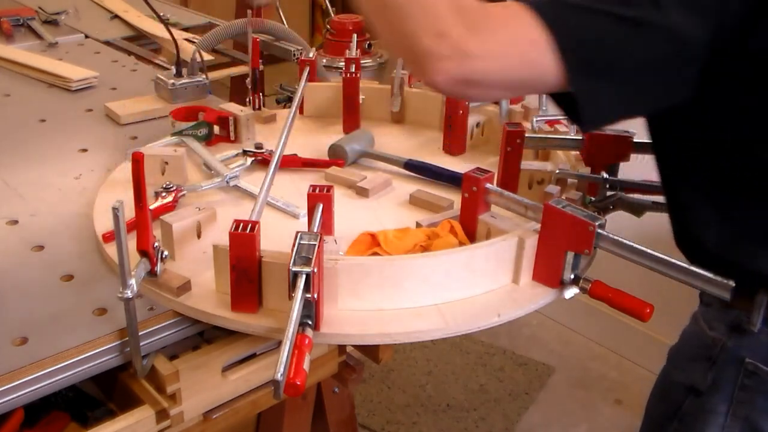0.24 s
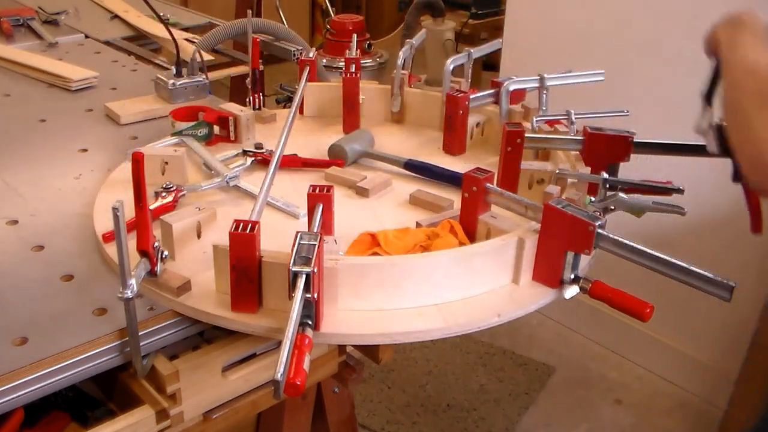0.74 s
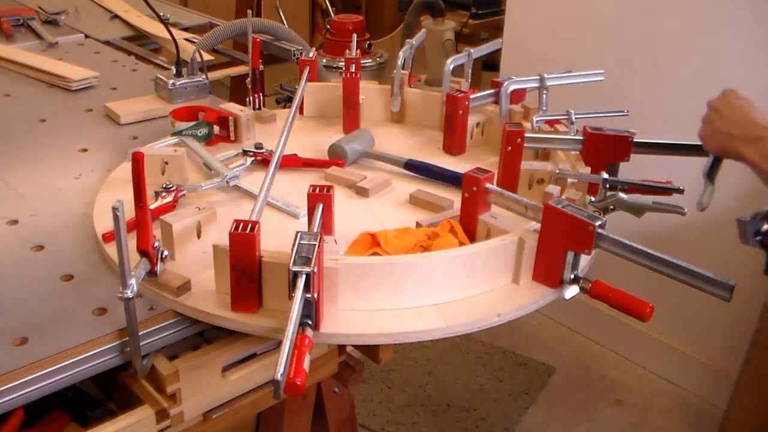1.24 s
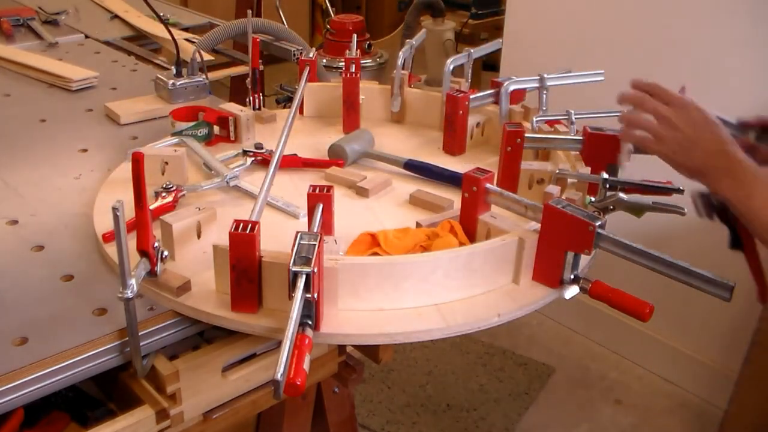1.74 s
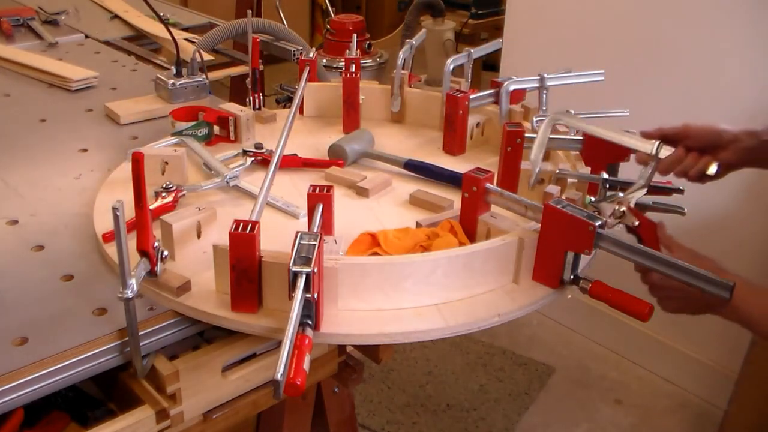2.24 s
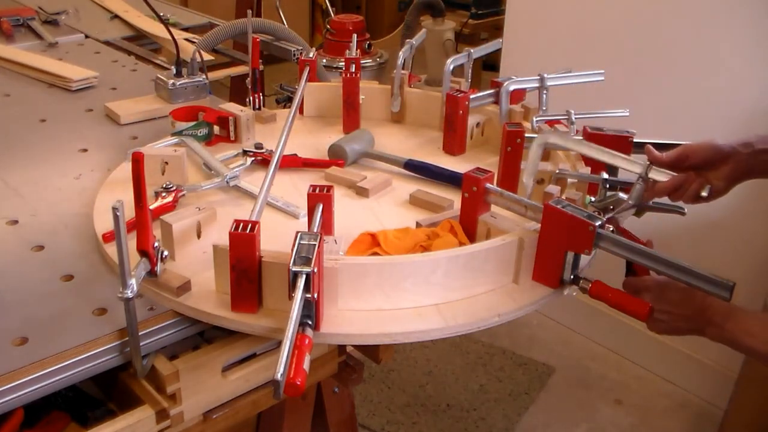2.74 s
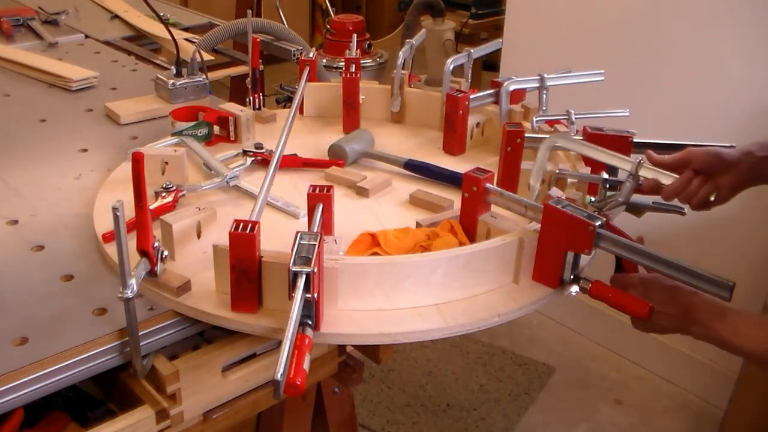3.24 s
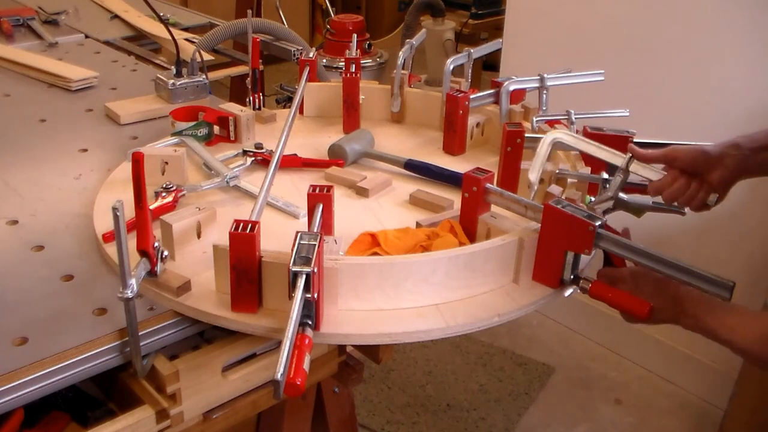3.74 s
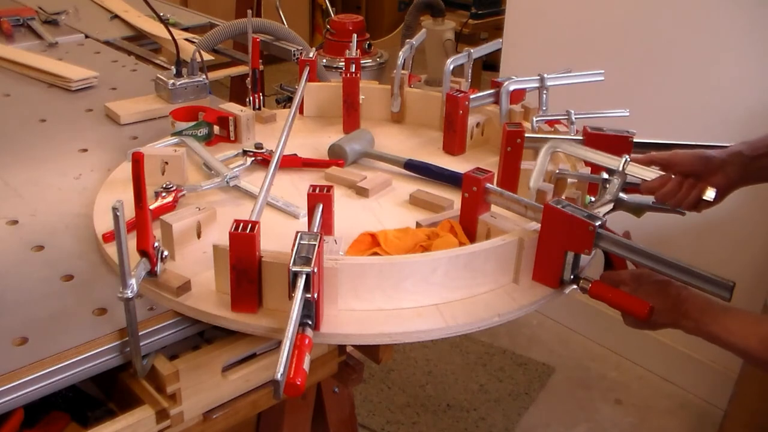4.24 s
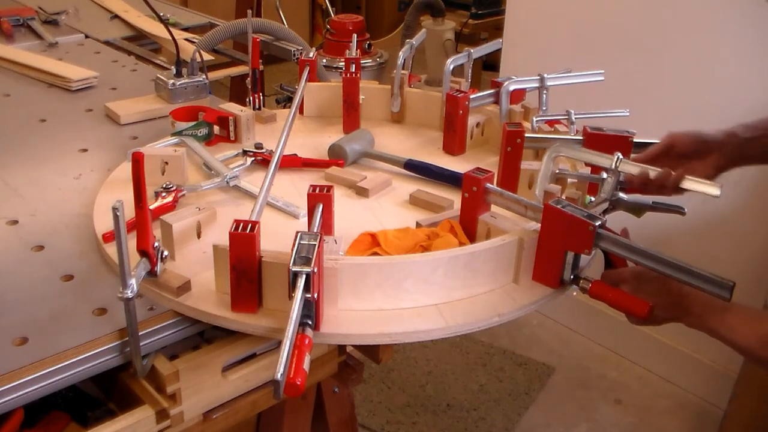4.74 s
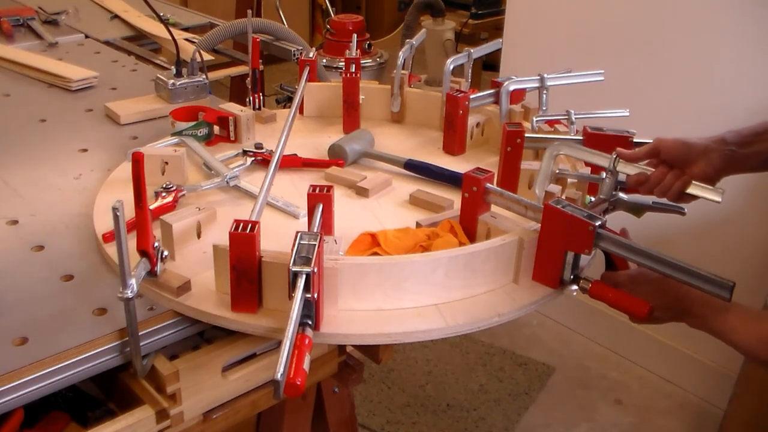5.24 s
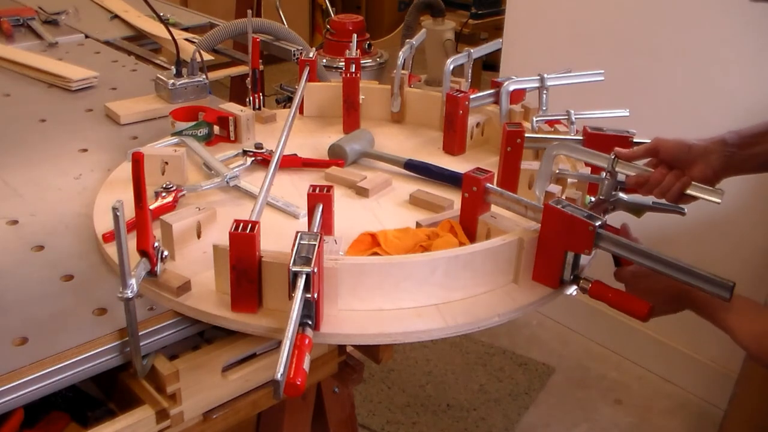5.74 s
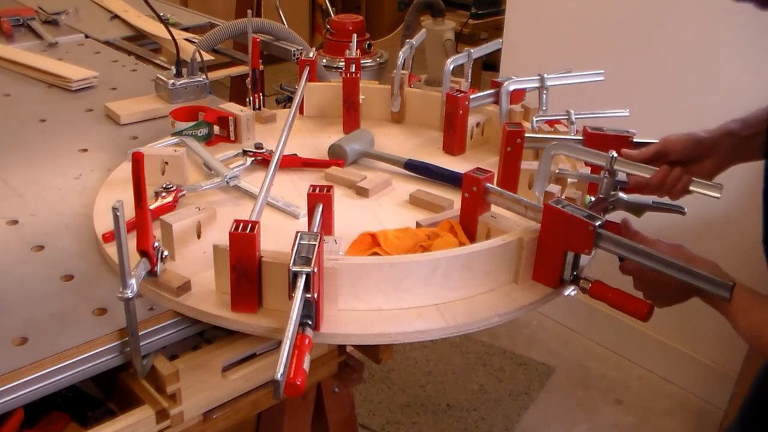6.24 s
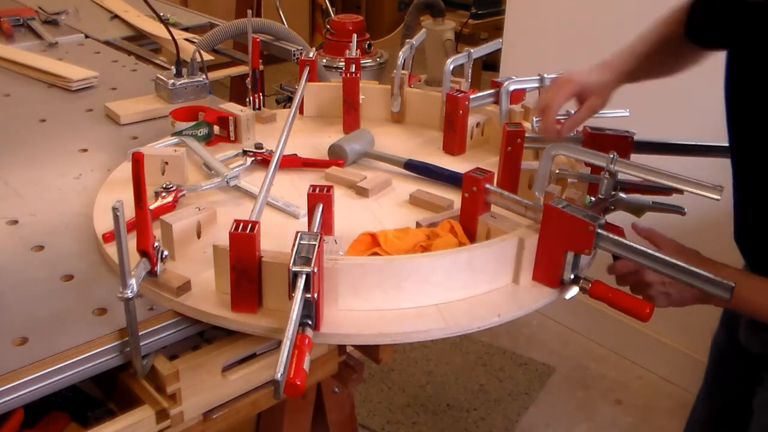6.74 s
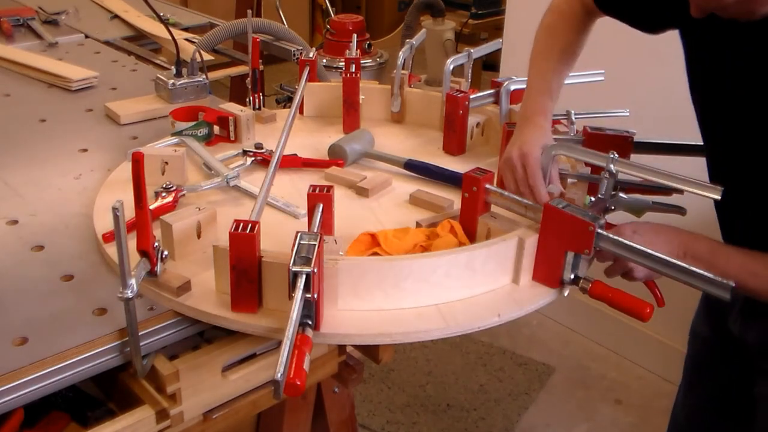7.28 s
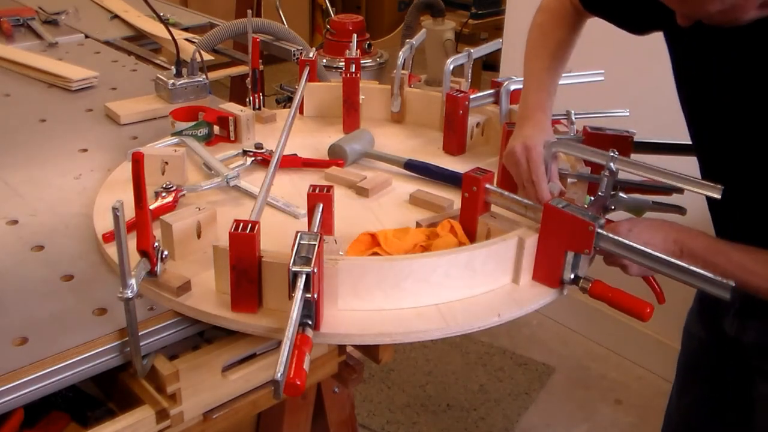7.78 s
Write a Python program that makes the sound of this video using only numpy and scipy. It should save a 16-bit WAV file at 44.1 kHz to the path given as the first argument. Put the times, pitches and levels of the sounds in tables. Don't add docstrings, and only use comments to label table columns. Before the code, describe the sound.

Loose metal clamps rattle, scrape open and clack hard against steel and wood, ringing briefly in a small humming workshop.

```python
import sys
import numpy as np
from scipy import signal
from scipy.fft import rfft, irfft, next_fast_len
from scipy.io import wavfile
from scipy.ndimage import uniform_filter1d, map_coordinates

SR = 44100
rng = np.random.default_rng(int(sys.argv[2]) if len(sys.argv) > 2 else 0)


def voltage_ratio(decibels):
    exponent = np.asarray(decibels, float) / 20
    return 10 ** exponent


def to_wav(sig):
    pcm = np.clip(np.atleast_2d(sig), -1, 1) * 32767
    pcm = np.round(pcm).astype(np.int16)
    wavfile.write(sys.argv[1], SR, pcm.T)


N = 353241

# start in seconds, level in dB, weight in dB, treble in dB.
STEEL_TAPS = [(0.214, -68, 4, 5), (0.5018, -39, -11, -2), (1.0268, -51, 4.5, -14), (1.879, -35.5, -7, 2.5),
              (2.0622, -44.5, -8, -22.5), (2.7877, -61.5, 6, -20), (3.0685, -66, 6, -15),
              (3.1533, -58.5, 4, -11), (3.1767, -44, -0.5, 0), (3.5929, -36, -5, -4),
              (4.2774, -37, -12, -19), (4.5261, -57.5, 9, -29), (4.699, -40, -16, -3), (4.848, -47, 6, -19),
              (5.1153, -27.5, -2, -8), (5.1267, -46, 2, -23), (5.198, -43.5, -4, 1.5),
              (5.244, -40, -10, -8), (5.2592, -33.5, 2, 0), (5.6264, -47, 13, -14), (5.7245, -40, -8, -5),
              (5.7352, -27, -3.5, -8), (5.9585, -46.5, 3, -14), (6.3824, -71, -5, 9), (6.533, -59, 15, 3),
              (6.574, -70, 0, 11), (6.7244, -31, -11, -3)]
# start in seconds, level in dB, weight in dB, treble in dB.
STEEL_RATTLES = [(0.323, -61.5, 9.5, -12), (0.4137, -59, 6, -5), (0.478, -51, -2, -5), (0.598, -52, -2, 0),
                 (0.6098, -40.5, -5, -4), (0.6531, -32.5, -5.5, -4), (0.791, -48.5, -1, -10),
                 (1.12, -49, 2.5, -6.5), (1.4698, -57, 5, -0.5), (1.6036, -53.5, 7, 0),
                 (1.798, -36.5, -3, -22), (1.9133, -54, -4, -7), (2.0793, -42, -3, -19),
                 (3.6075, -34, -9, 0), (3.7602, -42, -2, 1.5), (3.9112, -31, -1, -7.5),
                 (4.1335, -49.5, 1, -2), (4.6299, -36, -12, -2), (4.9915, -40, 0, -20),
                 (4.3, -41.5, 15.5, -2), (5.5969, -49.5, 10, -3), (5.7285, -30.5, -18, -8)]
# start in seconds, level in dB, weight in dB, treble in dB.
STEEL_SWELLS = [(1.812, -32, -2, -10), (1.826, -33, -3, -5), (1.842, -32.5, -8, 0), (1.858, -33, -8, 1),
                (2.108, -37.5, -5, -11), (2.166, -45.5, -4, 1), (2.338, -45, -7, -5), (3.605, -32.5, -4, 5),
                (3.648, -45, -2, 5), (3.704, -35, -4, 3), (3.84, -42, -4, 2), (3.862, -35, -8, 5),
                (4.287, -35.5, -5, -5), (7.197, -55, 8, 3)]
# frequency in Hz, level in dB per Hz.
STEEL_COLOUR = [(410, -42), (700, -23.5), (1850, -5), (2160, -4.5), (4380, 0.5), (5380, -3), (5960, -2.5),
                (12200, -11), (14300, -19.5), (15000, -55)]
# centre in Hz, width in Hz, level in dB.
JAW_MODES = [(2316, 58, -13.5), (3130, 240, -6.5), (3774, 260, 1), (5130, 830, -1.5), (7040, 270, -14)]
# start in seconds, fastest moment in seconds, end in seconds, steel rasp in dB, wood rub in dB.
STROKES = [(0.307, 0.416, 0.8, -61, -45.5), (0.41, 0.535, 0.82, -55, -29.5),
           (0.56, 0.662, 0.65, -38, -27.5), (1.797, 1.822, 1.872, -17.5, -56),
           (1.822, 1.862, 1.86, -17.5, -59), (2.06, 2.106, 2.32, -35.5, -53.5),
           (2.31, 2.335, 2.61, -37, -53.5), (3.587, 3.606, 3.7, -24.5, -51.5),
           (3.7, 3.715, 3.82, -26.5, -50.5), (3.82, 3.875, 3.93, -23, -40.5),
           (4.284, 4.313, 4.46, -32.5, -21), (4.606, 4.658, 4.89, -49, -31.5),
           (5.107, 5.125, 4.8, -39, -37), (5.224, 5.265, 5.29, -25.5, -22.5),
           (7.184, 7.201, 7.28, -43, -44.5), (7.294, 7.341, 10, -62, -54.5), (7.53, 7.54, 7.64, -54, -45),
           (7.545, 7.68, 7.8, -50, -46.5), (7.89, 7.91, 7.9, -72, -54)]
# start in seconds, level in dB, treble in dB.
BARE_CRACKS = [(1.913, -31, -1), (2.121, -36, -19), (3.913, -36, -20), (4.322, -26.5, -10),
               (5.109, -26, -21), (5.1171, -20.5, -10), (5.127, -14.5, -19), (5.2605, -25, -6),
               (5.266, -22.5, -5), (5.596, -47, -6), (5.628, -35, -12), (5.7288, -24, -8),
               (5.7355, -23, -6), (5.7408, -30, -8), (5.791, -38, -20), (6.7253, -23, 2), (7.5338, -64, 23),
               (7.5388, -64, 24), (7.542, -65, 18)]
# frequency in Hz, t60 in seconds.
BAR_MODES = [(5515, 0.12), (8985, 0.09), (11885, 0.082)]
# start in seconds, low mode in dB, middle mode in dB, high mode in dB.
BAR_BLOWS = [(0.5, -75, -70, -78), (0.6, -70, -56, -70), (0.654, -70, -52, -70), (1.882, -60, -46, -63),
             (1.899, -54, -53, -70), (2.064, -58, -70, -75), (2.17, -70, -55, -68), (3.62, -38, -44, -47),
             (3.708, -53, -60, -50), (3.76, -65, -52, -49), (3.866, -59, -40, -43), (3.947, -60, -49, -66),
             (4.134, -77, -69, -64), (4.288, -58, -70, -57), (4.63, -53, -53, -64), (4.7, -70, -50.5, -69),
             (5.01, -76, -61.5, -75), (5.115, -62, -53, -55), (5.198, -67, -55, -61),
             (5.262, -54, -53, -52), (5.96, -67, -64, -75)]
# start in seconds, frequency in Hz, level in dB.
LOOSE_RINGS = [(0.61, 4090, -54), (0.653, 6550, -61), (0.79, 2260, -56), (0.79, 5040, -58),
               (1.026, 2260, -64), (1.027, 3480, -70), (1.123, 2870, -57), (1.815, 2220, -45),
               (1.798, 5150, -45), (1.799, 7740, -53), (1.799, 6400, -53), (1.805, 3200, -44),
               (1.809, 5100, -41), (1.826, 2210, -40), (1.83, 3000, -39), (1.84, 3900, -42),
               (1.846, 4800, -40), (1.855, 5400, -37), (1.836, 7800, -46), (1.862, 7800, -47),
               (1.874, 3680, -39), (1.911, 3700, -46), (2.062, 3850, -55), (2.081, 2865, -50),
               (2.103, 3800, -49), (2.068, 5300, -58), (2.11, 5300, -50), (2.342, 3950, -56),
               (2.333, 6100, -62), (2.117, 6520, -52), (1.816, 2830, -39), (2.117, 4910, -47),
               (3.595, 6140, -46), (3.706, 3140, -59), (3.858, 4800, -43), (4.3, 2870, -43),
               (4.278, 5200, -50), (4.291, 5600, -46), (4.365, 5000, -50), (4.32, 1650, -38),
               (4.32, 1840, -41), (4.345, 1520, -42), (4.32, 2400, -42), (5.116, 3635, -58),
               (5.197, 8160, -55), (5.262, 7740, -44), (5.735, 6510, -48), (5.734, 4780, -40),
               (5.74, 5250, -42), (5.729, 3650, -41), (5.792, 1290, -50), (5.735, 7700, -60),
               (6.531, 5890, -63), (6.724, 3240, -44), (6.724, 4050, -45), (6.724, 4400, -48),
               (6.724, 5030, -54), (6.727, 1400, -33), (7.2, 2010, -62)]
# start in seconds, frequency in Hz, level in dB, t60 in seconds.
FREE_RINGS = [(4.991, 3852, -46, 0.41), (5.742, 3800, -42, 0.5), (5.74, 4780, -45, .3),
              (5.745, 5270, -46, .35), (5.74, 6510, -53, .3), (5.8, 1600, -47, .3), (5.735, 5090, -39, .35),
              (6.741, 210, -47.5, .25), (2.115, 2870, -49, 0.4), (2.062, 2780, -50, 0.3),
              (4.322, 401, -34, 0.3), (3.93, 207, -46, .3), (2.35, 3070, -57.5, .6), (.478, 208, -38, 0.26),
              (0.59, 207, -41.5, 0.63), (3.931, 115, -54, 0.63), (5.26, 122, -57, 1),
              (7.39, 10100, -75, .3), (7.46, 12000, -75, .3), (7.66, 9400, -75, .5), (3.176, 1600, -58, .2),
              (3.176, 3800, -57, .25), (5.8, 700, -44, .3)]
# start in seconds, fastest moment in seconds, end in seconds, level in dB.
HAND_WIPES = [
    (7.19, 7.22, 7.34, -58.5),
    (7.52, 7.66, 7.78, -61),
]
# start in seconds, level in dB, depth in dB, bite in dB.
WOOD_KNOCKS = [(0.322, -46, 0.5, -16), (0.482, -50.5, 8.5, 0), (0.593, -28.5, -8, -12),
               (0.652, -34, -14, 0), (0.95, -63, 2.5, 4.5), (1.336, -59, -16, -20), (1.473, -62, -3, 1.5),
               (1.803, -73, -11, 5), (3.912, -30, -18, 4.5), (3.94, -33, -5, -2), (4.135, -40.5, 0.5, 0),
               (4.3, -38.5, -3, -20), (4.32, -38, 10, 10.5), (4.345, -47, 4.5, 1), (4.629, -45, -2, 9),
               (4.7, -45.5, 3.5, -38), (4.847, -37, -8, -11.5), (5.116, -37, -8, 2), (5.128, -36, -3, 1.5),
               (5.194, -32.5, -8, -12), (5.251, -43, -1, 4), (5.596, -41.5, -10, 6.5),
               (5.627, -38.5, -2, 0), (5.79, -33, -12.5, -9), (5.844, -52, 4.5, 12), (6.072, -52, 1, -25),
               (6.533, -52, -4, -4), (6.725, -30, -8, 1.5), (7.531, -47, -6.5, -10)]
# centre in Hz, width in Hz, level in dB.
PLYWOOD_MODES = [(225, 57, -6.5), (329, 77, -3), (408, 73, 0), (515, 118, 1), (700, 101, 4), (774, 132, 1),
                 (1100, 225, -4), (1266, 82, 1), (1490, 340, -5), (2320, 1260, -23)]
# frequency in Hz, t60 in seconds.
ROOM_DECAY = [(150, 0.67), (600, 0.57), (1500, 0.51), (4000, 0.4), (8000, 0.34), (14000, 0.32)]
# frequency in Hz, likeness from 0 to 1.
ROOM_ALIKE = [(300, 1), (1500, 0.96), (3000, 0.83), (6000, 0.3), (12000, 0.1)]
# frequency in Hz, level in dB.
HUM_TONES = [(60, -1.5), (121.6, -19), (179.6, -15.5), (225, -26.5), (30.3, -8)]
# frequency in Hz, level in dB per Hz.
AIR_COLOUR = [(8, -8.5), (20, -14), (40, -17.5), (70, -8), (128, -14), (229, -18.5), (294, -14.5),
              (398, -21), (940, -23.5), (3000, -28), (12400, -31), (13800, -30), (15000, -52)]
# frequency in Hz, likeness from 0 to 1.
AIR_ALIKE = [(60, 0.5), (180, 0.33), (540, 0.24), (1630, 0.31), (4910, 0.071), (14800, 0.021)]
# time in seconds, level in dB.
BACKGROUND_LEVEL = [(0, -53), (0.5, -51), (1.4, -52), (2.6, -51.5), (3.3, -53.5), (4.06, -52.5),
                    (4.5, -51.5), (6.2, -52), (7.4, -51), (8.01, -52)]
# start in seconds, depth in dB, hold in seconds.
DUCKS = [
    (0.68, 2, 0.026),
    (1.83, 7.5, 0.39),
    (5.056, 4, 0.35),
    (6.69, 4.5, 0.25),
]

TAP_CHATTER_DB, RATTLE_CHATTER_DB, SWELL_CHATTER_DB = -6.5, -0.5, 6
TAP_CHATTER_S, RATTLE_CHATTER_S, SWELL_CHATTER_S = 0.024, 0.065, 0.045
SWELL_S = 0.004
RISE_DB, FALL_DB = 17.5, 29.5
RASP_TREBLE_DB, TREBLE_GROWS = -16, 0.9
BAR_UNREST_HZ, LOOSE_UNREST_HZ = 90, 300
LOOSE_T60_S = 0.06
DUCK_S, RECOVER_S = 0.12, 0.13
PEAK, TOP_HZ = 0.3, 14250


def unit(x):
    return x / np.sqrt(np.mean(x ** 2) + 1e-20)


def along(points, hz):
    f, v = np.transpose(points)
    return np.interp(np.log(hz + 1), np.log(f + 1), v)


def filtered(x, response):
    n = x.shape[-1]
    m = next_fast_len(n + SR // 4)
    spectrum = rfft(x, m) * response(np.fft.rfftfreq(m, 1 / SR))
    return irfft(spectrum, m)[..., :n]


def split(x, edge_hz):
    low = signal.butter(4, edge_hz, fs=SR, output="sos")
    high = signal.butter(4, edge_hz, "high", fs=SR, output="sos")
    return signal.sosfilt(low, x), signal.sosfilt(high, x)


def widen(pair, alike):
    def turn(hz):
        return np.arccos(np.clip(along(alike, hz), -1, 1)) / 2

    mid = filtered(pair[0], lambda hz: np.cos(turn(hz)))
    side = filtered(pair[1], lambda hz: np.sin(turn(hz)))
    return np.array([mid + side, mid - side])


def resonance(hz, centre_hz, width_hz):
    return 1j * hz * width_hz / (centre_hz ** 2 - hz ** 2 + 1j * hz * width_hz)


def flutter(rate, count):
    knots = rng.standard_normal(int(count * rate / SR) + 4)
    return map_coordinates(knots, [np.arange(count) * rate / SR], order=1)


def blows(count, sharp_s, follow_s, share, bounce_hz):
    t = np.arange(SR // 6) / SR
    bounce = voltage_ratio(4.5 * flutter(bounce_hz, count=count * len(t)).reshape(count, -1))
    strength = voltage_ratio(-60 * t / sharp_s) + share * bounce * voltage_ratio(-60 * t / follow_s)
    force = rfft(rng.standard_normal((count, len(t))) * strength, SR // 3)
    evenness = np.sqrt(uniform_filter1d(np.abs(force) ** 2, size=50, axis=1))
    return irfft(force / evenness, SR // 3)[:, :len(t)]


def place(bursts, times, levels_db, first_s):
    size = np.sqrt(np.mean(bursts[:, :int(first_s * SR)] ** 2, axis=1))
    out = np.zeros(N + SR)
    for burst, s, gain in zip(bursts, times, voltage_ratio(levels_db) / size):
        out[round(s * SR):][:len(burst)] += gain * burst
    return out[:N]


def grit(rate, spread_db):
    slips = (rng.random(N) < rate / SR) * rng.standard_normal(N)
    return unit(slips * voltage_ratio(spread_db * rng.standard_normal(N)))


def stroke_gain(t, row, level_db, rise_db, fall_db):
    shape_db = np.interp(t, row[:3], [-rise_db, 0, -fall_db], left=-200, right=-200)
    return voltage_ratio(level_db + shape_db)


def slide(column):
    t = np.arange(0, N / SR, 0.001)
    gain = sum(stroke_gain(t, row, row[column], RISE_DB, FALL_DB) for row in STROKES)
    return np.interp(np.arange(N) / SR, t, gain)


def steel_contact(hz):
    modes = sum(voltage_ratio(db) * resonance(hz, centre, width) for centre, width, db in JAW_MODES)
    return voltage_ratio(along(STEEL_COLOUR, hz)) * (1 + modes)


def steel_cracks():
    s, db, weight_db, treble_db = np.transpose(STEEL_TAPS + STEEL_RATTLES + STEEL_SWELLS)
    kinds = [[TAP_CHATTER_DB, RATTLE_CHATTER_DB, SWELL_CHATTER_DB],
             [TAP_CHATTER_S, RATTLE_CHATTER_S, SWELL_CHATTER_S],
             [1 / SR, 1 / SR, SWELL_S]]
    counts = [len(STEEL_TAPS), len(STEEL_RATTLES), len(STEEL_SWELLS)]
    chatter_db, chatter_s, rise_s = np.repeat(kinds, counts, axis=1)[..., None]
    force = blows(count=len(s), sharp_s=0.0054, follow_s=chatter_s, share=voltage_ratio(chatter_db - 5.0),
                  bounce_hz=404.5)
    force = force * (1 - np.exp(-np.arange(force.shape[1]) / SR / rise_s))
    body, treble = split(filtered(force, steel_contact), edge_hz=5930)
    weight, body = split(body, edge_hz=2440)
    return (place(weight, s, db + weight_db - 10.5, first_s=0.0082)
            + place(body, s, db - 5.0, first_s=0.0064)
            + place(treble, s, db + treble_db - 3.5, first_s=0.012))


def jaw_rasp():
    body, treble = split(filtered(grit(1800, spread_db=2.0), steel_contact), edge_hz=10000)
    push = slide(column=3)
    bright = voltage_ratio(RASP_TREBLE_DB) * push ** TREBLE_GROWS * unit(treble)
    return voltage_ratio(-14) * (push * unit(body) + bright)


def snaps():
    s, db, treble_db = np.transpose(BARE_CRACKS)
    crack = blows(count=len(s), sharp_s=0.004, follow_s=0.062, share=0.12, bounce_hz=400)
    body, treble = split(split(crack, edge_hz=1340)[1], edge_hz=4900)
    return place(body, s, db - 4.0, first_s=0.0021) + place(treble, s, db + treble_db, first_s=0.0015)


def ringing():
    t = np.arange(SR // 4) / SR
    bar = [(s, hz, db, t60) for s, *levels in BAR_BLOWS for (hz, t60), db in zip(BAR_MODES, levels)]
    loose = [(*row, LOOSE_T60_S) for row in LOOSE_RINGS]
    s, hz, db, t60 = np.transpose(bar + loose)
    bar_unrest = 0.7 + 0.45 * flutter(BAR_UNREST_HZ, count=len(bar) * len(t))
    loose_unrest = 0.3 + 0.8 * flutter(LOOSE_UNREST_HZ, count=len(loose) * len(t))
    unsteady = np.concatenate([bar_unrest, loose_unrest]).reshape(len(s), -1)
    envelope = voltage_ratio(-60 * t / t60[:, None]) * (1 - np.exp(-t / 0.0031))
    tones = unsteady * envelope * np.sin(2 * np.pi * hz[:, None] * t)
    return place(tones, s, db + 1.0, first_s=0.031)


def free_ringing():
    t = np.arange(SR // 2) / SR
    s, hz, db, t60 = np.transpose(FREE_RINGS)
    envelope = voltage_ratio(-60 * t / t60[:, None]) * (1 - np.exp(-t / 0.0015))
    return place(envelope * np.sin(2 * np.pi * hz[:, None] * t), s, db, first_s=0.04)


def hand():
    t = np.arange(N) / SR
    gain = sum(stroke_gain(t, row, row[3], rise_db=8.0, fall_db=12.0) for row in HAND_WIPES)
    return gain * unit(split(grit(6000, spread_db=9.0), edge_hz=7400)[1])


def plywood(hz):
    return sum((-1) ** k * voltage_ratio(db) * resonance(hz, centre, width)
               for k, (centre, width, db) in enumerate(PLYWOOD_MODES))


def wood():
    s, db, depth_db, bite_db = np.transpose(WOOD_KNOCKS)
    force = blows(count=len(s), sharp_s=0.024, follow_s=0.079, share=0.43, bounce_hz=200)
    deep, rest = split(filtered(force, plywood), edge_hz=491)
    middle, bite = split(rest, edge_hz=902)
    parts = [(deep, depth_db), (middle, 0), (bite, bite_db)]
    thuds = sum(place(part, s, db + rel_db - 5.0, first_s=0.026) for part, rel_db in parts)
    rub = slide(column=4) * unit(filtered(grit(1500, spread_db=4.0), plywood))
    return thuds + voltage_ratio(-12.5) * rub


def room(x):
    size = SR // 10
    blocks = np.pad(x, (0, -N % size)).reshape(-1, size)
    noise = rng.standard_normal((2, len(blocks), SR * 2 // 3))
    hz, t, z = signal.stft(noise, SR, nperseg=256)
    z = z * voltage_ratio(-60 * t / along(ROOM_DECAY, hz)[:, None]) * (1 - np.exp(-t / 0.0009))
    tails = signal.istft(z, SR, nperseg=256)[1]
    tails = tails / np.sqrt(np.mean(np.sum(tails ** 2, -1)))
    wet = signal.fftconvolve(blocks[None], tails, axes=2)
    out = np.zeros((2, N + SR))
    for k in range(len(blocks)):
        out[:, k * size:k * size + wet.shape[2]] += wet[:, k]
    return widen(out[:, :N], ROOM_ALIKE)


def ducking():
    t = np.arange(N) / SR
    dips = sum(np.interp(t, np.cumsum([s, DUCK_S, hold, RECOVER_S]), [0, db, db, 0])
               for s, db, hold in DUCKS)
    return voltage_ratio(np.interp(t, *np.transpose(BACKGROUND_LEVEL)) - dips)


def background():
    t = np.arange(N) / SR
    skew = np.array([[-0.15], [0.15]])
    hum = sum(voltage_ratio(db) * np.sqrt(2) * np.sin(2 * np.pi * (hz * t + rng.random()) + skew)
              for hz, db in HUM_TONES)
    noise = rng.standard_normal((2, N))
    air = widen(filtered(noise, lambda hz: voltage_ratio(along(AIR_COLOUR, hz))), AIR_ALIKE)
    return ducking() * (hum * voltage_ratio([[-0.7], [0.7]]) + voltage_ratio(-6.5) * unit(air))


def scene():
    def lag(hz):
        return np.exp(2j * np.pi * hz * np.array([[-1], [1]]) * 0.000009)

    clamp = steel_cracks() + jaw_rasp() + hand()
    form = wood()
    rings = ringing()
    near = clamp + form + voltage_ratio(2.0) * rings + snaps() + free_ringing()
    direct = filtered(np.array([near, near]), lag)
    return direct + room(voltage_ratio(4.0) * clamp + voltage_ratio(1.0) * form + voltage_ratio(0.5) * rings) + background()


def band_limit(x):
    return signal.sosfilt(signal.butter(12, 15380, fs=SR, output="sos"), x)


def record(dry):
    rounded = dry / (1 + (dry / PEAK) ** 4) ** (1 / 4)
    heard = filtered(rounded, lambda hz: 1 / (1 + (hz / TOP_HZ) ** 110))
    return band_limit(heard)


dry = scene()
out = record(dry)
to_wav(out)
```